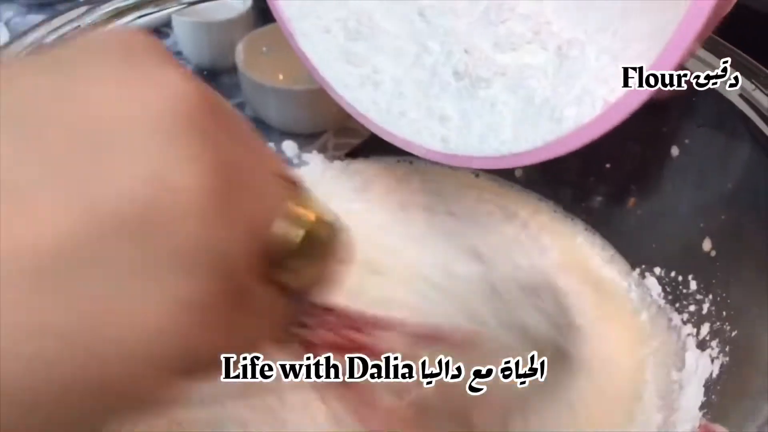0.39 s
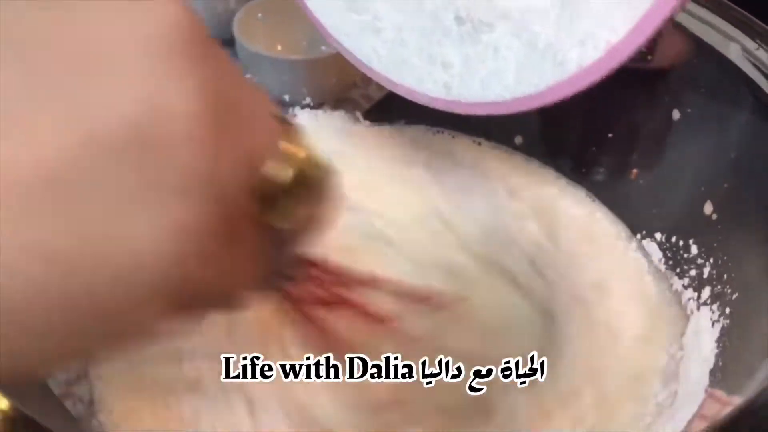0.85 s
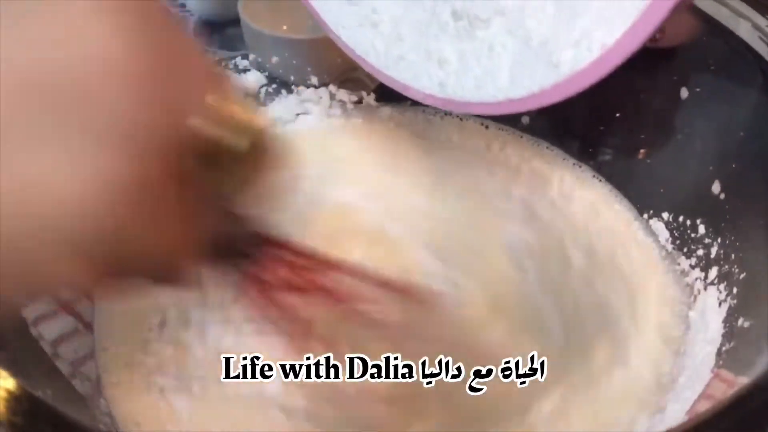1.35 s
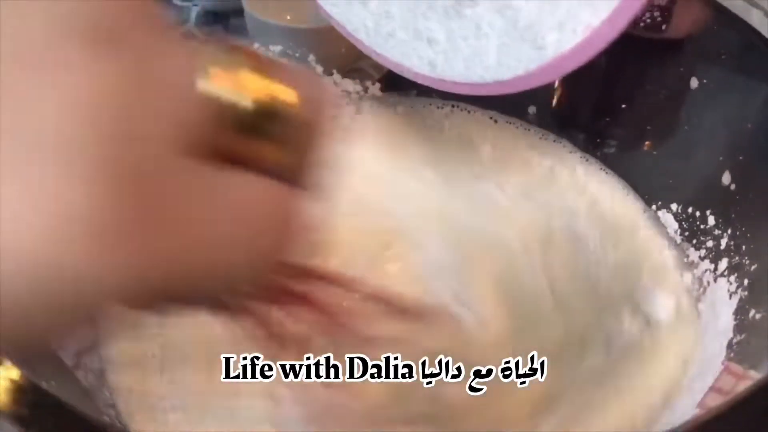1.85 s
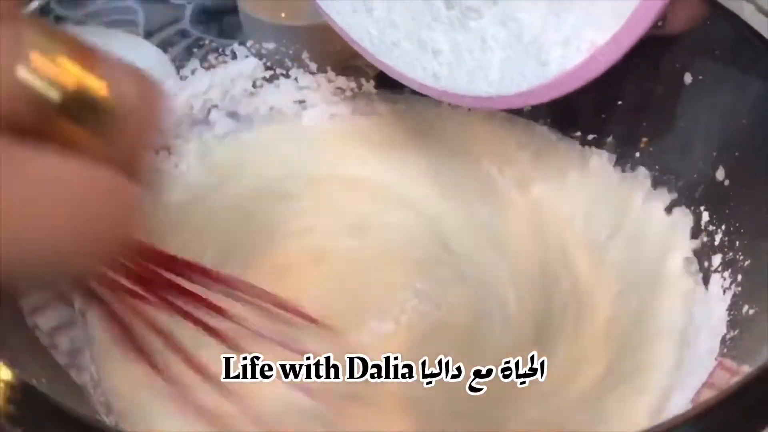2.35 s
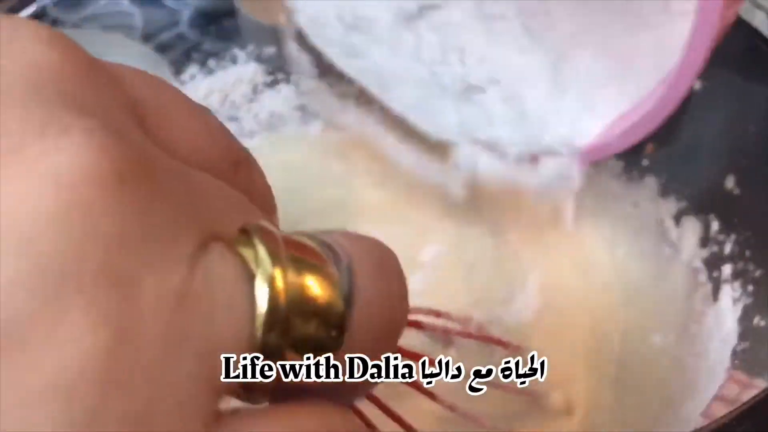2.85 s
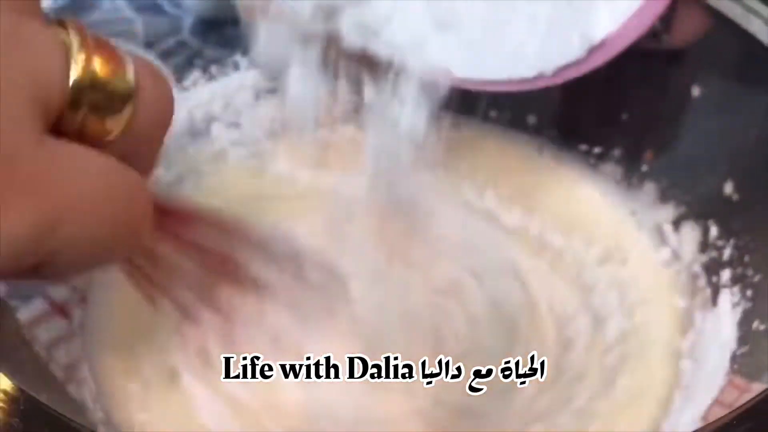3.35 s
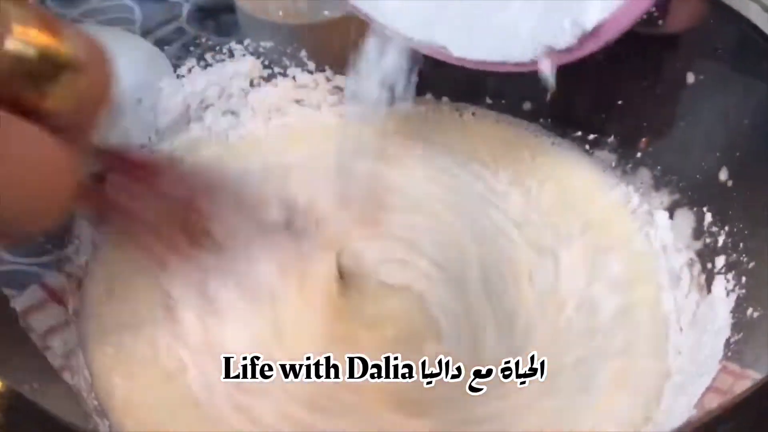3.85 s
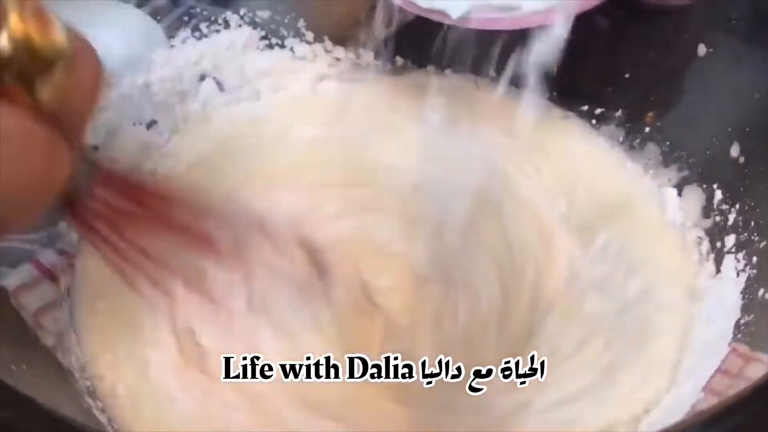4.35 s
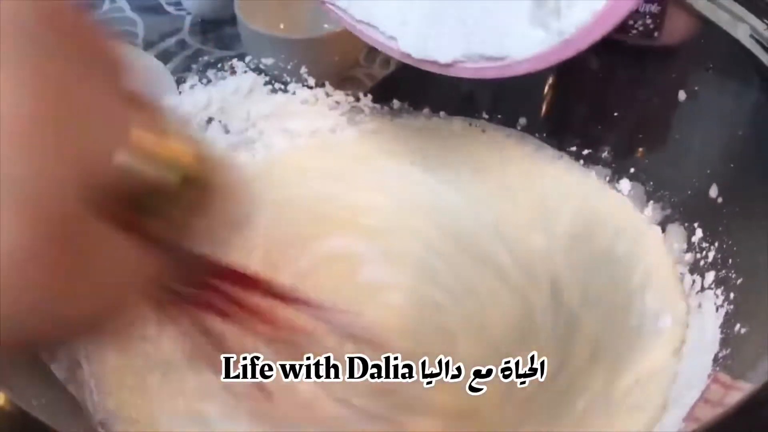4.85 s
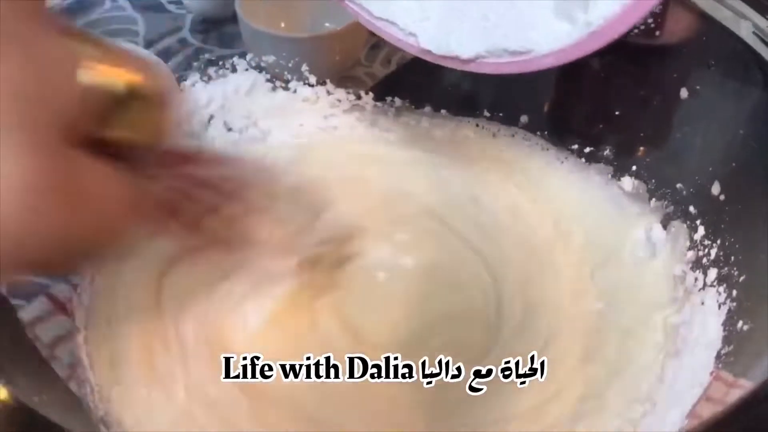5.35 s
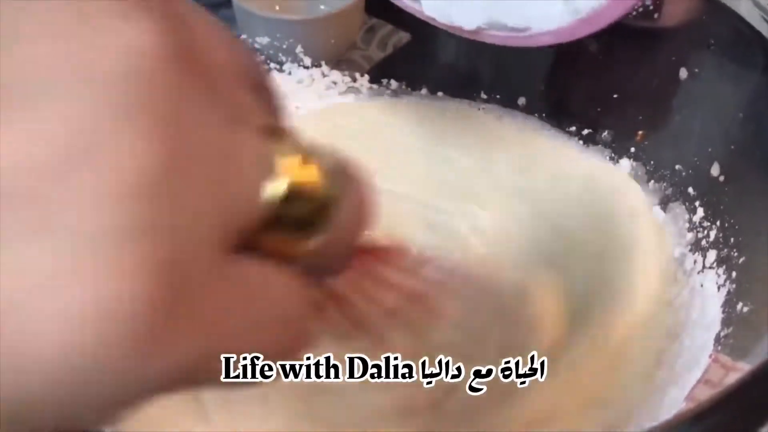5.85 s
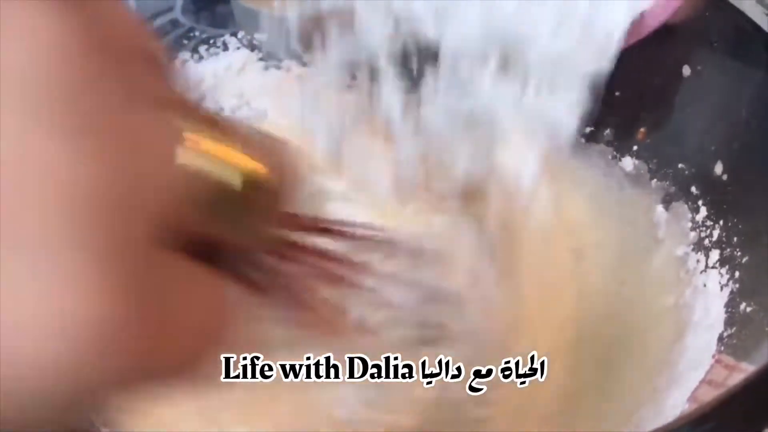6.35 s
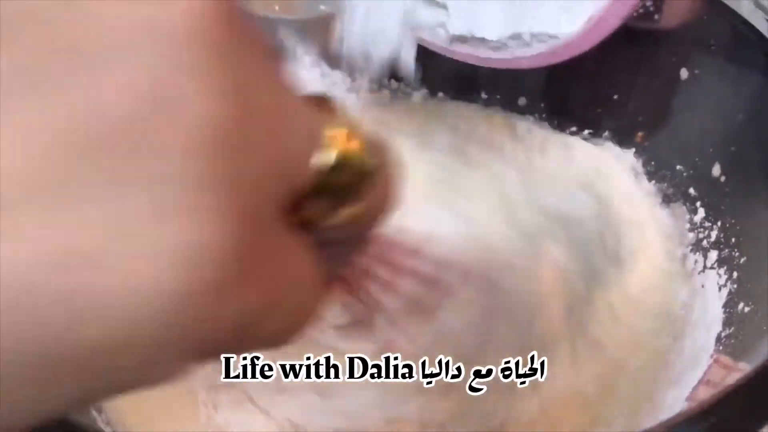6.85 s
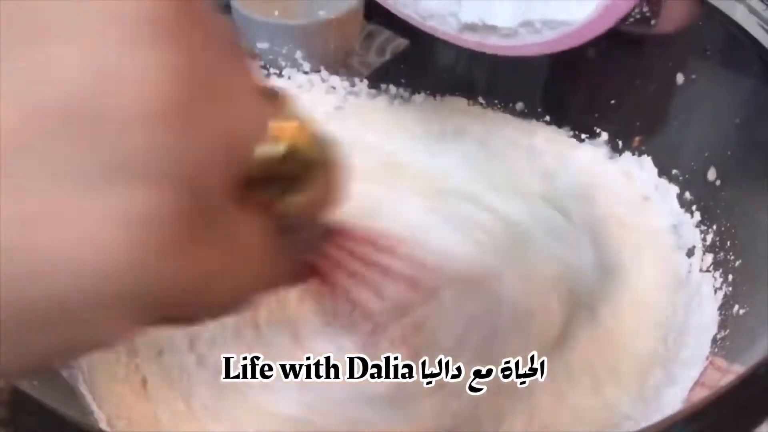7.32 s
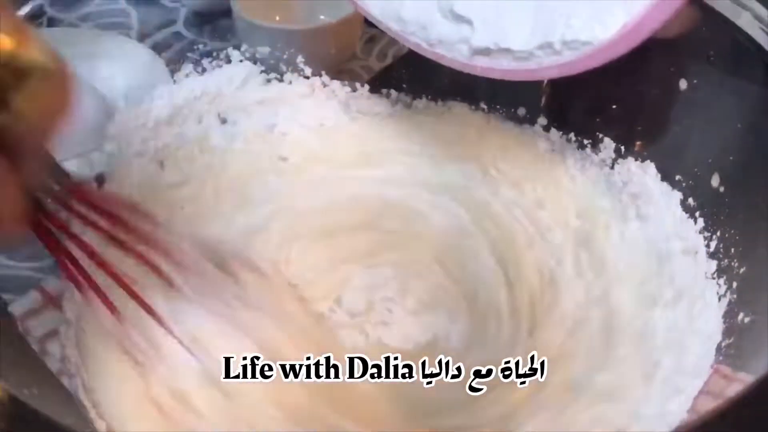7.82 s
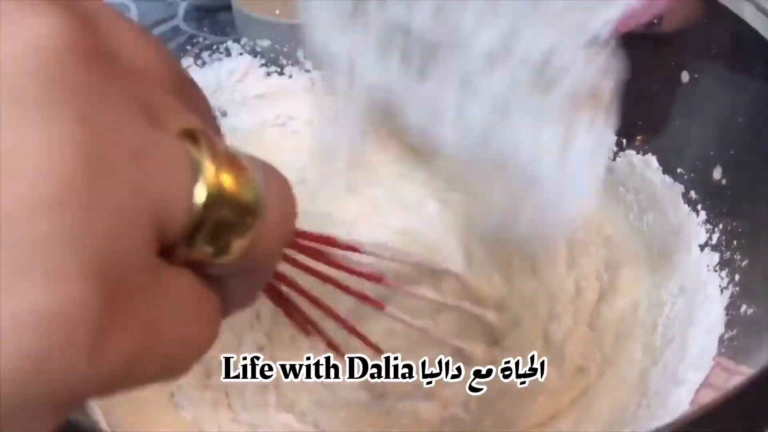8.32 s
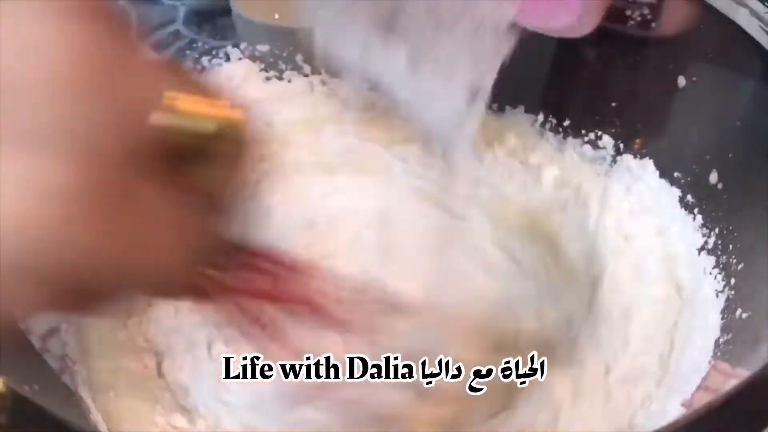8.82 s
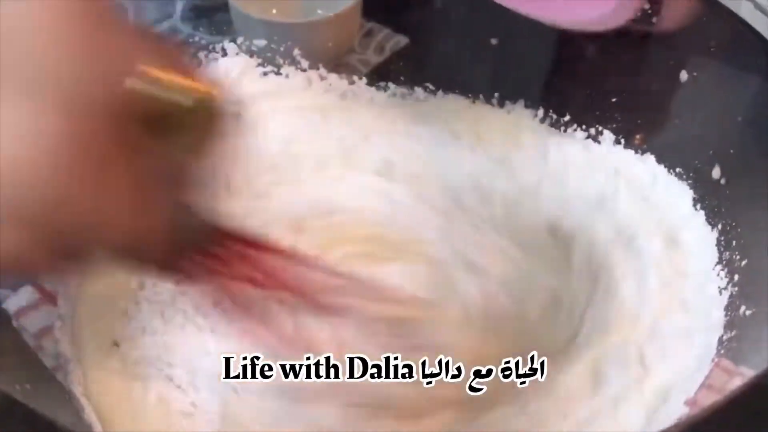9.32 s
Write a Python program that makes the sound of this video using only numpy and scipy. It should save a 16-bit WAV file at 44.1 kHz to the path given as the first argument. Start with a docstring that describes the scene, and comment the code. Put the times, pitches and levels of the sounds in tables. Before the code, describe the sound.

Close, dry sound of whisking by hand in a batter-filled bowl. It starts busy, with short wire ticks, muted hollow knocks and brisk wet-gritty swishes, plus one small clean cup ring. After about two seconds it drops to a quieter patter of soft taps and rubs with brief lulls. Deeper thuds return near the end. Low appliance rumble and soft hiss continue underneath.

```python
"""Soft kitchen hum and hiss lie under a coated wire whisk that rubs and swishes through thick batter in a bowl.
Almost at once its wires tap the wall: a short tick, then a dull knock of the batter-damped bowl.
Rub, swish and flour fizz are filtered grit and noise; knocks are damped bowl modes, ticks are damped wire
sines with noise. A small cup nearby rings once, as a few decaying sines."""
import sys
import numpy as np
from scipy import signal
from scipy.fft import rfft, irfft, next_fast_len
from scipy.io import wavfile
from scipy.ndimage import map_coordinates

SR = 44100
rng = np.random.default_rng(int(sys.argv[2]) if len(sys.argv) > 2 else 0)


def waveform_to_disk(signal):
    """Save audio, clipped to [-1, 1], as 16-bit WAV at the path in sys.argv[1]."""
    frames = np.transpose(np.atleast_2d(signal))
    scaled = np.clip(frames, -1, 1) * 32767
    samples = np.round(scaled).astype(np.int16)
    wavfile.write(sys.argv[1], SR, samples)


def magnitude_from_level(level_db):
    """Linear magnitude for a level in decibels (20 dB per decade)."""
    exponent = np.asarray(level_db, float) / 20
    return 10 ** exponent


N = 427769


def unit(x):
    """Scale to rms 1."""
    return x / np.sqrt(np.mean(x ** 2) + 1e-20)


def along(points, hz):
    """(Hz, value) points read on a log frequency axis."""
    f, v = np.transpose(points)
    return np.interp(np.log(hz + 1), np.log(f + 1), v)


def wobble(rate):
    """A smooth random curve, rate knots a second."""
    knots = rng.standard_normal(int(N * rate / SR) + 4)
    return map_coordinates(knots, [np.arange(N) * rate / SR])


def filtered(x, response):
    """Filter x by a complex response of frequency."""
    m = next_fast_len(len(x) + 8192)
    return irfft(rfft(x, m) * response(np.fft.rfftfreq(m, 1 / SR)), m)[:len(x)]


def resonances(peaks):
    """Causal response of (Hz, width Hz, dB) resonances, summed with alternating signs."""
    def response(f):
        total = 0
        for k, (centre, width, db) in enumerate(peaks):
            damping = 1j * f * width
            total = total + (-1) ** k * magnitude_from_level(db) * damping / (centre * centre - f * f + damping)
        return total
    return response


def band(lo_hz, hi_hz):
    """Causal two-pole edges around a pass band."""
    return lambda f: (1j * f / (lo_hz + 1j * f)) ** 2 * (hi_hz / (hi_hz + 1j * f)) ** 2


def grit(per_s, spread_db):
    """Sparse random impulses of uneven but bounded size, rms 1."""
    hit = rng.random(N) < per_s / SR
    sign_and_size = np.tanh(rng.standard_normal(N))
    boost_db = spread_db * np.minimum(rng.exponential(size=N), 2.4)
    return unit(hit * sign_and_size * magnitude_from_level(boost_db))


# Tone of the whole kitchen bed. Each row: frequency in Hz, relative density in dB per Hz.
KITCHEN = [(15, -72), (33, -52), (52, -12), (87, 4.5), (208, -5.5), (273, -7), (330, -1.5), (470, -3),
           (1150, -21.5), (1510, -16), (2200, -20.5), (2600, -22), (6210, -22.5), (7300, -42.5),
           (13300, -28.5), (15750, -30.5), (16050, -70)]
# Where the rumble gathers. Each row: frequency in Hz, width in Hz, relative level in dB.
DRONE = [(74, 7, -2), (156.8, 17, -4.5), (217.4, 10, 0.5)]


def kitchen():
    """Steady appliance rumble and hiss: shaped noise plus a resonant drone, both wavering slightly."""
    hush = unit(filtered(rng.standard_normal(N), lambda f: magnitude_from_level(along(KITCHEN, f))))
    gathered = lambda f: resonances(DRONE)(f) * band(50, 260)(f)
    drone = unit(filtered(rng.standard_normal(N), gathered))
    hush_db = -62.5 + 0.17 * wobble(3.0)
    drone_db = -64.5 + 0.15 * wobble(0.18)
    return magnitude_from_level(hush_db) * hush + magnitude_from_level(drone_db) * drone


# The slow stirring. Each row: time in seconds, then relative levels in dB of the rubbing on the bowl,
# the swish of wires in batter and the fizz of flour.
STIR = [(0, -55.5, -61.5, -66), (0.449, -57, -55, -66), (.63, -68.5, -67, -69), (.9, -54, -62, -63.5),
        (1.7, -61, -69.5, -71.5), (2.3, -71.5, -69, -66.5), (2.4, -77.5, -88, -74), (2.72, -78.5, -93, -73),
        (2.82, -62.5, -77, -70.5), (3.052, -55, -65, -66), (3.62, -67, -66.5, -66.5),
        (4.298, -58, -64.5, -64), (5.199, -67, -77.5, -67), (5.669, -73.5, -76, -67.5),
        (6.27, -57.5, -72.5, -69), (6.798, -67.5, -70.5, -65), (7.755, -78, -77, -62.5),
        (8.099, -84.5, -73, -68), (8.849, -57, -64.5, -63), (9.7, -68, -68, -61)]
# Scrapes of the wires along the wall. Each row: centre in seconds, length in seconds (between the points
# where the swell is 10 dB down), relative rubbing level in dB, relative swish level in dB.
SCRAPES = [(0.082, 0.034, -55, -45), (0.237, 0.023, -41.5, -43), (0.308, .06, -62.5, -55),
           (0.385, 0.025, -42.5, -37.5), (0.451, .056, -45.5, -47.5), (0.53, 0.025, -71.5, -51.5),
           (0.655, 0.048, -63.5, -50), (0.699, 0.037, -56.5, -42), (0.795, 0.035, -64, -54),
           (0.855, 0.038, -49, -41.5), (0.947, 0.053, -62.5, -53.5), (1.006, 0.03, -46, -41),
           (1.049, 0.024, -55.5, -44.5), (1.099, 0.058, -64.5, -54), (1.163, .053, -53.5, -50.5),
           (1.264, 0.035, -73.5, -52), (1.324, 0.05, -46, -46.5), (1.427, 0.043, -59.5, -49.5),
           (1.477, 0.058, -50.5, -54.5), (1.594, 0.073, -73, -54.5), (1.677, .052, -48, -53),
           (1.778, 0.055, -69, -53.5), (1.82, 0.037, -50.5, -67), (2.089, 0.063, -52, -61),
           (2.342, .05, -64.5, -59.5), (3.03, 0.023, -65.5, -59), (3.143, 0.039, -57, -67),
           (2.814, 0.045, -58, -72), (3.344, .03, -54, -59), (3.441, 0.024, -62.5, -58),
           (3.607, 0.045, -71.5, -63), (3.774, 0.058, -70, -63), (3.883, 0.05, -66, -59.5),
           (4.106, 0.046, -63.5, -60), (4.238, .016, -56.5, -69), (4.381, 0.033, -54, -61),
           (4.453, 0.033, -68.5, -58), (4.569, 0.049, -56, -60.5), (4.843, 0.05, -65.5, -63.5),
           (4.963, .03, -60, -59), (5.052, 0.073, -57, -65.5), (5.258, 0.032, -58.5, -66),
           (5.48, 0.035, -60.5, -61.5), (5.689, 0.053, -57.5, -69), (5.912, 0.076, -60.5, -66),
           (6.108, 0.03, -53.5, -57), (6.242, 0.04, -57, -62), (6.306, .08, -56.5, -66),
           (6.411, 0.067, -56.5, -66), (6.64, .11, -57.5, -67), (7.104, 0.05, -56, -61),
           (7.569, 0.07, -66.5, -65), (7.75, .07, -71.5, -67), (7.855, 0.076, -73, -68),
           (8.231, .04, -52, -52), (8.327, 0.037, -49, -61.5), (8.502, 0.18, -70.5, -68),
           (8.647, .044, -53, -61), (8.759, 0.025, -51.5, -61), (9.133, .11, -61.5, -65),
           (9.293, 0.04, -59, -55), (9.637, .069, -53.5, -58)]


def effort():
    """Rubbing, swish and fizz gains: the slow stirring plus, in power, a swell for every scrape."""
    fizz_db, fizz_follows, usual_swish_db = -56, 0.58, -45.5  # fizz grows only partly with the swish
    t = np.arange(N) / SR
    s, *levels = np.transpose(STIR)
    power = np.array([magnitude_from_level(np.interp(t, s, level)) ** 2 for level in levels])
    for at, length, rub_db, swish_db in SCRAPES:
        scrape_fizz_db = fizz_db + fizz_follows * (swish_db - usual_swish_db)
        peak = magnitude_from_level(np.array([rub_db, swish_db, scrape_fizz_db])) ** 2
        span = slice(max(int((at - 2 * length) * SR), 0), int((at + 2 * length) * SR))
        swell = np.exp(-((t[span] - at) / (.5 * length)) ** 2 * 2.3)
        power[:, span] += peak[:, None] * swell
    return np.sqrt(power)


def pricks(count, mid_hz, cycles, spread_db):
    """Tiny wire contacts: short damped sines of scattered pitch and size, rms 1."""
    when = rng.random(count)
    size = np.minimum(rng.exponential(size=count), 3)
    hz = np.clip(mid_hz * np.exp(0.56 * rng.standard_normal(count)), 900, 12000)[:, None]
    n = np.arange(SR // 200)
    decay = np.exp(-n / SR * hz / cycles)
    grains = magnitude_from_level(spread_db * size)[:, None] * decay * np.sin(2 * np.pi * hz * n / SR)
    places = (when * N).astype(int)[:, None] + n
    return unit(np.bincount(places.ravel(), grains.ravel(), N + len(n))[:N])


# Low modes of the loaded bowl, rubbed here and knocked by the taps.
# Each row: frequency in Hz, relative level in dB, base time to fall 60 dB in seconds.
BOWL = [(214, -7, .05), (265, -6, .04), (338, -4, .07), (420, -3, .035), (478, 1, .032), (560, -2, .028),
        (660, -3, .026), (735, -2, .032), (1050, -8, .025), (1500, -8, .03)]
# Upper resonances of the bowl wall, also heard in the ticks.
# Each row: frequency in Hz, width in Hz, relative level in dB.
WALL = [(1470, 54, 7.5), (2320, 160, 11), (2610, 110, -22), (2930, 58, 6), (3390, 140, 4.5),
        (4510, 340, 10), (5440, 390, 0)]
# Tone of wires in batter. Each row: frequency in Hz, relative density in dB per Hz.
SWISH = [(500, -46), (900, 14.5), (1500, 1), (2200, 6.5), (3400, 9), (5000, 4), (7000, -2), (10000, -66)]
# Tone of fine flour grit. Each row: frequency in Hz, relative density in dB per Hz.
FIZZ = [(4000, 3), (6500, 7), (10000, 5), (14000, -2), (15700, -7), (16100, -60)]


def stirring():
    """Wires drag along the wall in tiny slips and shear the batter and flour in gritty gusts."""
    rub_gain, swish_gain, fizz_gain = effort()
    gust = np.tanh(wobble(45))  # single wires catch and let go

    # a mode's bandwidth follows from its decay; 0.68 sharpens it
    modes = [(hz, 0.68 * np.log(1000) / np.pi / t60, db) for hz, db, t60 in BOWL]
    slips = magnitude_from_level(7.4 * np.tanh(wobble(30)) + 0.46 * gust) * grit(600, spread_db=1.1)
    rub = unit(filtered(slips, lambda f: band(150, 2500)(f) * resonances(modes)(f)))

    shear = magnitude_from_level(4.6 * gust) * (1.5 * grit(2500, spread_db=7.0) + rng.standard_normal(N))
    colour = lambda f: magnitude_from_level(along(SWISH, f)) * (1.33 + 0.31 * np.abs(resonances(WALL)(f)))
    contacts = pricks(count=1500, mid_hz=1868, cycles=3.5, spread_db=1.0)
    swish = unit(filtered(shear, colour)) + 0.77 * contacts

    flour_gust = magnitude_from_level(1.4 * gust + 0.7 * np.tanh(wobble(10)))
    flour = flour_gust * (0.64 * grit(1500, spread_db=7.5) + rng.standard_normal(N))
    fizz = unit(filtered(flour, lambda f: magnitude_from_level(along(FIZZ, f))))

    return magnitude_from_level(-4.5) * rub_gain * rub + magnitude_from_level(-3.0) * swish_gain * swish + magnitude_from_level(-2.57) * fizz_gain * fizz


def light_touches(count):
    """Rows like TAPS for the faint chance contacts, denser where the rubbing is strong."""
    busy = np.cumsum(effort()[0] ** 0.48)
    when = rng.random(count)
    luck = np.tanh(rng.standard_normal((4, count)))
    s = np.searchsorted(busy, when * busy[-1]) / SR
    knock_db = -55 + 3 * luck[0]
    hz = 420 * np.exp(.4 * luck[1])
    tick_db = -8 + 5 * luck[2]
    edge_db = -13 + 6 * luck[3]
    return np.transpose([s, knock_db, hz, tick_db, edge_db])


# Whisk taps on the bowl. Each row: start in seconds, relative knock level in dB, favoured bowl pitch in Hz,
# wire tick in dB against the knock, brittle edge in dB against the knock.
TAPS = [(.054, -41, 664, 0, -20), (.076, -31, 487, -1, -24), (.124, -33.5, 534, 7, -11),
        (.225, -50, 475, 9, -15), (.228, -25.5, 512, -4, -39), (.272, -44.5, 487, 13, -16),
        (.28, -31, 595, 6.5, -40), (.351, -44, 600, 4, -20), (.368, -37.5, 507, -5, -28),
        (.381, -48, 458, 6, -19), (.4275, -20, 474, 5.5, -49), (.552, -54, 590, 16, -2),
        (.655, -25.5, 380, 0, -31), (.692, -32, 790, -15, -18), (.736, -38.5, 584, 7, -5.5),
        (.849, -36, 482, -15, -28), (.855, -30.5, 543, -3, -33), (.889, -23, 485, -13, -28),
        (.902, -29, 507, -2, -36), (1.005, -30, 483, 3, -30), (1.043, -48, 335, 9, -6),
        (1.051, -35.5, 480, 2.5, 5), (1.154, -49, 397, 5, -4), (1.156, -43.5, 1500, 7, -17),
        (1.321, -38, 760, 7, -21), (1.331, -33, 940, 2.5, -16), (1.352, -38.5, 424, -5, -28),
        (1.438, -31, 655, -14, -22), (1.473, -43, 1390, 8, -13), (1.505, -44.5, 416, 3, -30),
        (1.607, -33.5, 624, -12, -35), (1.651, -40.5, 920, -1, -20), (1.654, -57, 600, 0, 15),
        (1.697, -31.5, 430, -14, -29), (1.793, -33.5, 440, -26, -31), (1.821, -43, 352, -9, -2),
        (1.847, -51.5, 460, 12.5, 5.5), (2.034, -39.5, 402, -15, -21), (2.076, -31, 454, -27, -35),
        (2.16, -40.5, 387, -25, -25), (2.522, -68, 400, 18, -2), (2.773, -46, 696, -9, -29),
        (2.835, -44, 335, -21, -28), (2.948, -53, 330, 7.5, -15), (2.957, -49, 330, 3.5, -11),
        (2.986, -53, 480, -8, -22), (3.022, -59, 480, -2, -15), (3.073, -50.5, 786, 3, -19),
        (3.101, -38.5, 394, -10, -34), (3.125, -45.5, 480, -6, -25), (3.176, -42.5, 645, -19, -13.5),
        (3.226, -46.5, 486, -0.5, -14), (3.315, -37.5, 376, -13, -21), (3.333, -42, 500, -10, -12),
        (3.406, -54, 450, 4, -8), (3.477, -36, 444, -14.5, -36), (3.501, -44.5, 350, -24, -10),
        (3.667, -47, 734, -11, -20), (3.674, -61.5, 450, 2, 9), (3.723, -40.5, 536, -16, -13),
        (3.838, -56, 450, 1.5, 5.5), (3.918, -51.5, 330, 5, -6), (4.01, -42.5, 380, -15, -20),
        (4.015, -53.5, 450, 5.5, 1.5), (4.057, -51.5, 412, 7, 6), (4.093, -48, 463, 1, -6),
        (4.131, -48.5, 710, 10, -4.5), (4.188, -45.5, 403, -3, -9), (4.232, -61, 436, -4, 13),
        (4.237, -33, 442, -29, -8), (4.256, -43, 640, -6, -24), (4.279, -46.5, 680, 3, -8),
        (4.366, -46, 530, -12, -13), (4.401, -41.5, 427, 8.5, 1.5), (4.445, -59, 450, 17, 4),
        (4.462, -42, 721, -18, -18), (4.49, -52.5, 480, 16, -11), (4.493, -37, 382, -21, -18),
        (4.534, -67, 450, 0, 10), (4.58, -58.5, 277, 7, 7), (4.592, -40.5, 337, -25, -15),
        (4.964, -51, 450, -4, -5), (4.982, -49.5, 480, 8.5, -11), (4.987, -39.5, 358, -13, -22),
        (5.252, -48, 297, -18, -40), (5.423, -44.5, 356, -15, -15), (5.487, -47, 337, -17, -21),
        (5.833, -40, 345, -29, -26), (5.903, -51, 735, -10, -25), (5.924, -53.5, 336, 14, -3),
        (6.081, -45, 890, -1, -26), (6.095, -38.5, 746, 0.5, -21), (6.101, -38, 324, -16, -28),
        (6.116, -55, 1500, 3, -20), (6.18, -49, 700, -10, -25), (6.224, -54, 700, 2.5, -18),
        (6.241, -44, 218, -6, -20), (6.269, -53, 334, 1, -18), (6.284, -47, 330, -22, -35),
        (6.309, -39, 316, -14, -33), (6.324, -47.5, 330, -18, -33), (6.344, -53, 735, -8, -25),
        (6.383, -46, 300, -15, -25), (6.418, -44.5, 600, 1.5, -25), (6.599, -43, 625, 3, -16),
        (6.629, -46, 735, -3, -25), (6.64, -42.5, 335, -14, -28), (6.777, -48, 900, 1.5, -25),
        (7.078, -40.5, 614, -12, -20), (7.087, -41, 320, -7, -27), (8.21, -37.5, 277, -18, -25),
        (8.216, -73, 315, 13, 3), (8.235, -33, 260, -9, -21), (8.261, -28.5, 223, -15, -35),
        (8.322, -41.5, 313, -7, -35), (8.344, -28, 226, -22, -43), (8.391, -35.5, 290, -11, -38),
        (8.58, -51, 304, 7.5, 3), (8.595, -46.5, 596, -3, -20), (8.624, -47, 647, -8, -17),
        (8.648, -60, 208, 13, 19), (8.755, -40.5, 537, -5, -22), (8.763, -36.5, 500, 8.5, -2.5),
        (8.843, -55, 480, 7.5, -12), (8.867, -38, 460, -27, -29), (8.921, -58.5, 470, 14, 3.5),
        (8.924, -37.5, 470, -11, -30), (8.998, -43, 480, -14, -20), (9.022, -52, 466, 5.5, -5),
        (9.031, -40.5, 465, -12, -5.5), (9.071, -36.5, 500, -32, -30), (9.087, -40, 470, -10, -10.5),
        (9.114, -43.5, 640, -2, -22), (9.191, -46, 337, 8, -3.5), (9.265, -43.5, 540, 11.5, 12.5),
        (9.299, -50, 597, 8.5, -6), (9.419, -43, 410, 19, 10), (9.46, -48, 670, 7.5, -20),
        (9.588, -38, 644, -8, -15)]


def taps():
    """Each tap ticks a wire and drives the bowl modes nearest to its favoured pitch."""
    wire_hz, wire_top_hz, bare_db, db_per_octave = 1580, 5300, 2.5, 4
    tail_db, tail_t60 = -27, 0.2  # the dry rim hums on faintly after the batter has killed the knock
    ring_per_db, loose_hz = 0.18, 380  # above loose_hz a softer blow stays in the batter, rings shorter
    s, db, hz, tick_db, edge_db = np.vstack([TAPS, light_touches(count=35)]).T
    mode_hz, mode_db, t60 = np.transpose(BOWL)
    t = np.arange(SR // 6) / SR

    # a tick climbs from the wire's pitch once it stands out of the knock
    climb_octaves = np.maximum(tick_db - bare_db, 0) / db_per_octave
    tick_hz = np.minimum(wire_hz * 2 ** climb_octaves, wire_top_hz)

    # share each blow among the bowl modes
    scatter, detune = rng.standard_normal((2, len(s), len(BOWL)))
    reach_db = -np.minimum(30 * np.abs(np.log2(mode_hz / hz[:, None])), 27)
    gain = magnitude_from_level(mode_db + reach_db + 3.2 * scatter)
    gain /= np.linalg.norm(gain, axis=1, keepdims=True)
    softness = magnitude_from_level(ring_per_db * (db + 29.5))[:, None]
    ring_t60 = np.clip(softness ** (mode_hz > loose_hz), .4, 1.3) * t60
    # the coating cushions the blow, most where the wire ticks least
    cushion_s = np.clip(0.0012 * magnitude_from_level(-0.4 * tick_db), .0008, .004)

    rise = 1 - np.exp(-t / 0.0001)
    burst = rise * rng.standard_normal((len(s), 2, len(t)))
    rattle = 0.46 * magnitude_from_level(-60 * t / 0.013) + 0.03 * magnitude_from_level(-60 * t / 0.039)
    crack = rise * magnitude_from_level(-60 * t / 0.0012) * np.sin(2 * np.pi * 4300 * t)
    spike = magnitude_from_level(-60 * t / 0.00027) * np.cos(2 * np.pi * 8500 * t)  # first touch of bare wire
    edge_decay = 0.87 * magnitude_from_level(-60 * t / 0.012) + 0.057 * magnitude_from_level(-60 * t / 0.08)
    tail = magnitude_from_level(tail_db - 60 * t / tail_t60)

    knock, tick, edge = np.zeros((3, N + SR))
    for k, at in enumerate(np.round(s * SR).astype(int)):
        span = slice(at, at + len(t))
        phase = 2 * np.pi * (mode_hz * (1 + 0.019 * detune[k]))[:, None] * t
        decay = magnitude_from_level(-60 * t / ring_t60[k][:, None]) + tail
        cushion = 1 - np.exp(-t / cushion_s[k])
        knock[span] += magnitude_from_level(db[k] + 5.5) * cushion * (gain[k] @ (decay * np.sin(phase)))

        # a few cycles of wire; harder blows reach more of the stiff upper mode
        snap = rise * magnitude_from_level(-60 * t * tick_hz[k] / 16) * np.sin(2 * np.pi * tick_hz[k] * t)
        hard = min(magnitude_from_level(db[k] + tick_db[k] + 25), 3)
        snap = snap / (1 + hard) + 1.8 * hard * crack
        tick[span] += magnitude_from_level(db[k] + tick_db[k]) * (snap + rattle * burst[k, 0])
        edge[span] += magnitude_from_level(db[k] + edge_db[k]) * (2.2 * spike + burst[k, 1]) * edge_decay

    wall = lambda f: band(700, 9000)(f) * band(300, 9000)(f) * (0.62 + 0.5 * resonances(WALL)(f))
    knock = filtered(knock[:N], band(210, 9000))
    tick = magnitude_from_level(7) * filtered(tick[:N], wall)
    edge = magnitude_from_level(13.5) * filtered(edge[:N], band(4800, 10500))
    return -knock - tick - edge


# Cup modes. Each row: frequency in Hz, level in dB against the hit.
CUP = [(568, 1), (1513, -1), (2815, -7), (4500, -12), (8450, -17)]
# The one hit: start in seconds, level in dB, time in seconds at which the next jolt mutes the upper modes.
CUP_HIT = (0.655, -44.5, 0.737)
# Free ring of each mode in turn: time to fall 60 dB in seconds.
CUP_T60 = [.55, .42, .25, .16, .07]
# Extra damping of each mode in turn once muted: time to fall 60 dB in seconds, acting on top of the free ring.
CUP_MUTED_T60 = [1.5, .03, .03, .03, .03]


def cup():
    """A small cup, jolted through the table, rings on a few clean modes."""
    out = np.zeros(N)
    t = np.arange(SR // 2) / SR
    s, db, muted_s = CUP_HIT
    since_mute = np.maximum(t - (muted_s - s), 0)
    ring = np.zeros(len(t))
    for (hz, mode_db), t60, muted_t60 in zip(CUP, CUP_T60, CUP_MUTED_T60):
        level_db = db + mode_db - 60 * t / t60 - 60 * since_mute / muted_t60
        ring += magnitude_from_level(level_db) * np.sin(2 * np.pi * hz * t)
    out[round(s * SR):][:len(t)] = ring
    return out


def scene():
    """Bowl and cup, close and dry, over the kitchen."""
    return (kitchen() + stirring() + taps() + cup())[None]


def top_cut(x):
    """Nothing passes above the cut-off."""
    return signal.sosfilt(signal.butter(12, 16810, fs=SR, output="sos"), x)


def record(dry):
    """The microphone path ends steeply at its top frequency."""
    top_hz = 16700
    mix = filtered(dry[0], lambda f: 1 / (1 + (f / top_hz) ** 90))[None]
    return top_cut(mix)


dry = scene()
out = record(dry)
waveform_to_disk(out)
```